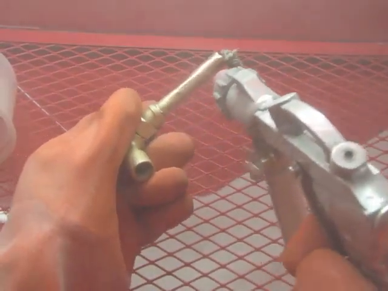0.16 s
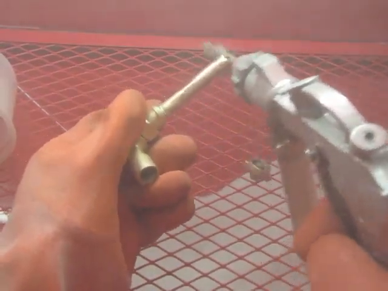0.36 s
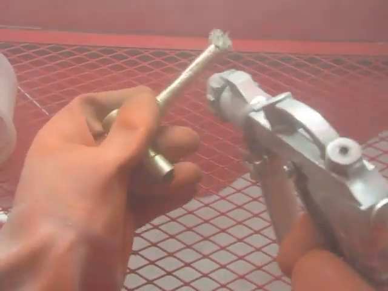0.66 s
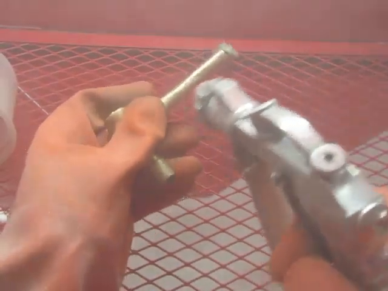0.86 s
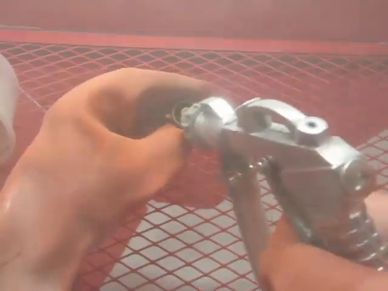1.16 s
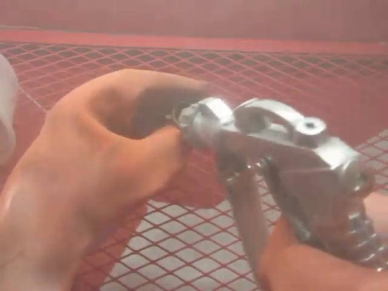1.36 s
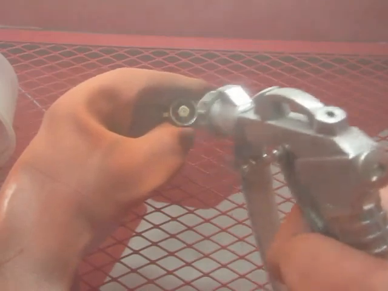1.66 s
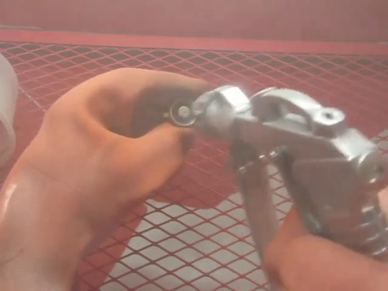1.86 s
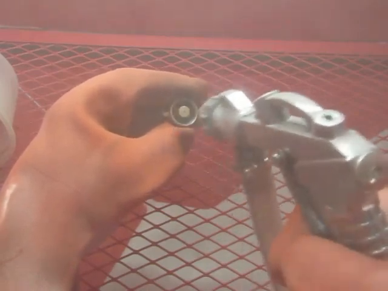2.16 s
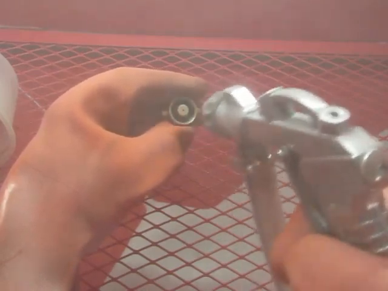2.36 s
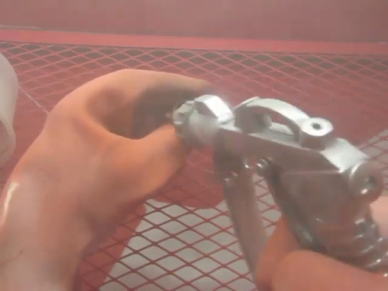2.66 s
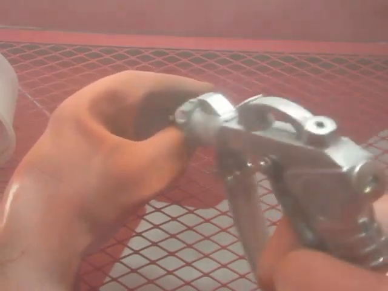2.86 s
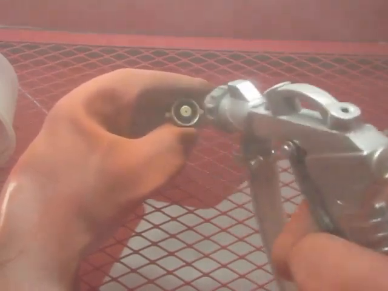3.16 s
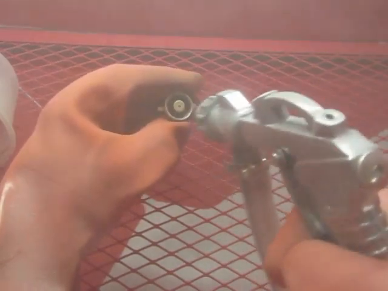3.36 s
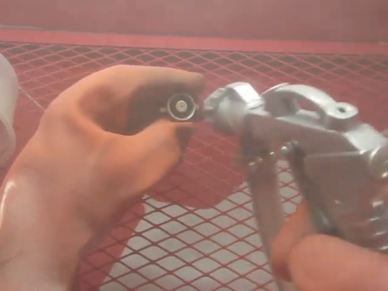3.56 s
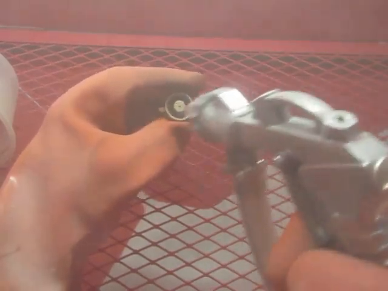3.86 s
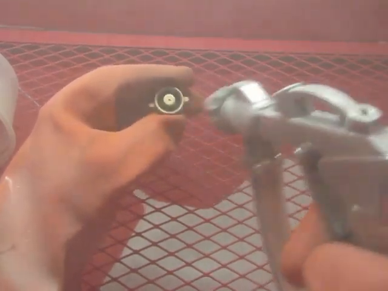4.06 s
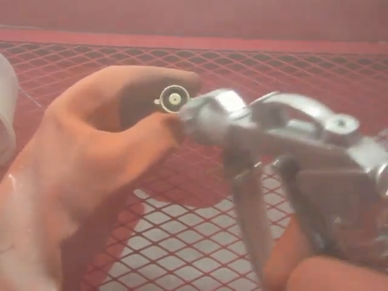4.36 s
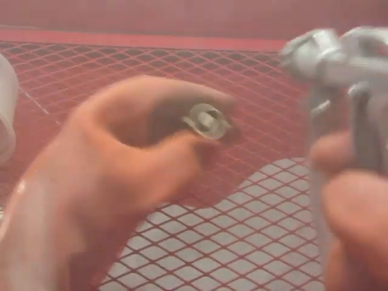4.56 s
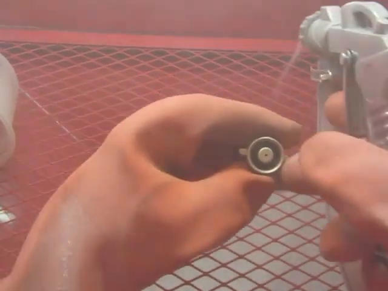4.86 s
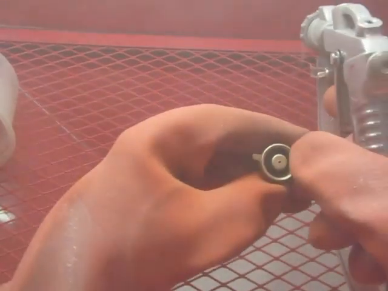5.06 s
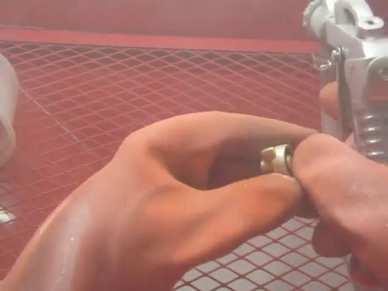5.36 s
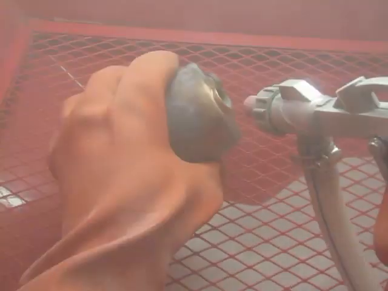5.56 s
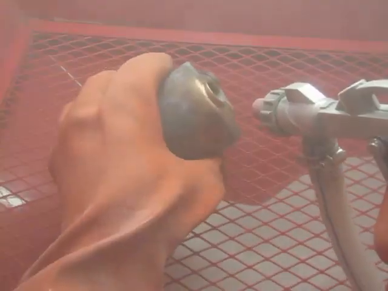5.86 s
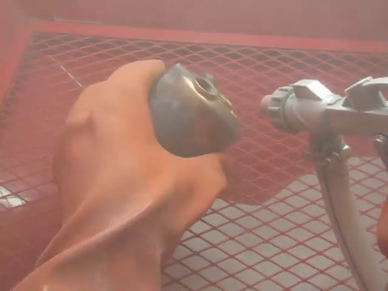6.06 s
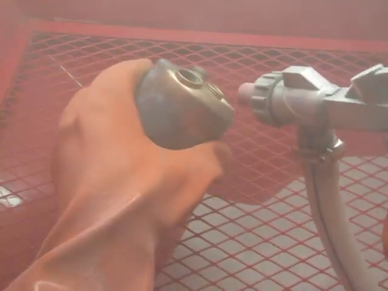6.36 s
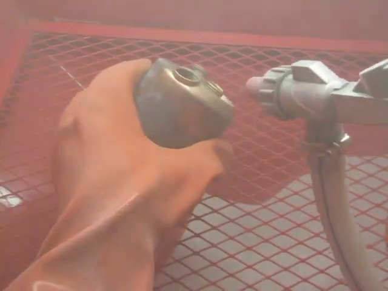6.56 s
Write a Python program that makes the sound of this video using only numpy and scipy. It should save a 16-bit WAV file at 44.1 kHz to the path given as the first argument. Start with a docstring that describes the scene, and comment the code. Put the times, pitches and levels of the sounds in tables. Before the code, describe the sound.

Workshop scene in three abruptly joined parts, heard close in stereo. First a soft, wobbly abrasive hiss on thin metal with a steady mechanical drone; then a brighter, quicker-pulsing hiss with sizzling metallic bands, fading to duller puffs until only the compressor hums, rising. Last, without the compressor, a full loud spray rushes against a hollow metal part, whistling and ringing before it drops away.

```python
"""A blast gun sprays grit at metal parts inside a closed cabinet, in three scenes joined by hard cuts.
First a thin tube hisses in wobbling bursts over a piston compressor: noise with ringing bands over shaft orders.
Its cupped end then hisses the same way; the trigger closes and the compressor drones on alone.
After a short gap a hollow casting roars and rings under the jet, close and loud, with no compressor."""
import sys
import numpy as np
from scipy import signal
from scipy.fft import irfft
from scipy.io import wavfile
from scipy.ndimage import uniform_filter1d

SR = 44100
rng = np.random.default_rng(int(sys.argv[2]) if len(sys.argv) > 2 else 0)


def rack_gain(trim_db):
    """Turn a fader trim in dB into the linear factor to multiply a signal by."""
    fader = np.asarray(trim_db, float)
    return 10 ** (fader / 20)


def output_pcm(signal):
    """Save a mono or channel-first signal as 16-bit PCM at the path in sys.argv[1].

    Samples are clipped to [-1, 1] before scaling.
    """
    pcm = np.clip(np.atleast_2d(signal).T, -1, 1) * 32767
    wavfile.write(sys.argv[1], SR, np.round(pcm).astype(np.int16))


N = 295911
SIZE, HOP = 2048, 256  # noise frames, samples
BIN_HZ = np.fft.rfftfreq(SIZE, 1 / SR)[:, None]
CUT_S, SHUT_S = 0.964, 4.68  # cut from tube to cup; trigger closed
TUBE_TURN = 0.01  # ringing bands drift in pitch by this share as the part turns

# left over right balance: freq_hz, balance_db
LEAN = [(60, -0.5), (180, -3.5), (550, -2.5), (1650, 0), (4970, -0.5), (15000, 1.4)]
# what the grit sets ringing in tube and cup: freq_hz, width_hz, level_db (before each jet's ring_db)
TUBE_RING = [ (4460, 440, -2.5), (5540, 360, 0), (6090, 160, 1.5), (7480, 520, -2), (10930, 350, 0)]
# reach of the sizzle control across the spectrum: freq_hz, gain_db_per_db
SIZZLE_REACH = [(3000, 0.17), (4150, 0.33), (4520, 0.18), (4900, 0.63), (6500, 0.78),
                (7550, 1.0), (9500, 0.92), (11000, 1.35), (15000, 1.2)]


def casting_blast():
    """Close jet on a hollow casting: aim at the rim whistles, aim into the hollow roars, rebounding grit fizzes."""
    # jet on the casting: start_s, hiss_db, whistle_db, roar_db, fizz_db (colours count relative to their means)
    strokes = [(5.4868, -28.5, -4.5, -9.5, 1), (5.62, -26.5, -3, -4, 3), (5.7, -29, -5.5, -11.5, 2.5),
               (5.85, -29, -5, -12.5, 0), (6.02, -33.5, -5, -22.5, -2.5), (6.06, -28.5, -3.5, -14.5, -7.5),
               (6.176, -30, -2.5, -6, -6), (6.27, -37, -4.5, -18, -4), (6.35, -40, -9, -22, -1),
               (6.43, -48.5, -9.5, -5, 6), (6.51, -39.5, -7.5, -11, -6), (6.71, -37, -9, -2, -4.5)]
    # jet colour: freq_hz, density_db_per_hz
    hiss = [(59, -93), (210, -49.5), (413, -28.5), (593, -24.5), (886, -12.5), (2200, -10), (3370, -5.5),
            (4160, -4), (5480, -4), (11000, -6.5), (13000, -12), (15800, -20)]
    # casting modes, with a low cabinet mode near 423 Hz: freq_hz, width_hz, level_db (before ring_db)
    ring = [(423, 18.6, -16.5), (513, 13, -21.5), (1580, 200, -11.5), (2496, 88, -9), (3420, 90, 2),
            (3850, 140, -8.5), (4650, 120, -6), (5370, 95, 1.5), (5810, 140, -6), (7930, 580, -8.5),
            (11030, 220, -8.5)]
    # the glove tightens and damps the modes of one band: time_s, gain_db
    grip = [(5.86, 0), (5.95, -6), (6.42, -6), (6.5, -2)]
    # reach of each colour control: freq_hz, gain_db_per_db
    whistle = [(2900, -0.53), (3420, -0.2), (4000, 0.57), (4900, 0.23), (5350, 1.6),
               (6200, 1.5), (7000, 1.85), (8500, 2.1), (10000, 0.77), (14000, 0.066)]
    roar = [(200, 0.95), (450, 1.25), (900, 1.2), (2000, 0.35), (3000, 0.28),
            (3440, 0.21), (4000, 0.019), (5400, 0.044), (7000, 0.14)]
    fizz = [(2600, -0.072), (3425, -0.19), (4500, 0.16), (5365, 0.054),
            (7000, 0.27), (9500, 0.66), (13000, 0.95), (15800, 0.7)]
    return jet(strokes, hiss, ring, [whistle, roar, fizz], ring_db=6.5, wander_db=0.6, patchy_db=1.6,
               gust_db=0.48, left_db=-2.2, turning=0.002, grip=grip, diffuse=0.82)


def cup_blast():
    """Jet passes over the tube's cupped end, whose ringing bands come and go."""
    # jet colour: freq_hz, density_db_per_hz
    hiss = [(220, -30), (880, -19), (1500, -14), (1880, -7), (2710, -4.5), (4390, 0.5), (4990, 0),
            (7620, 1.5), (12100, -1.5), (15800, -14.5)]
    return jet(passes(CUT_S, SHUT_S), hiss, TUBE_RING, [SIZZLE_REACH], ring_db=4.0, wander_db=2.8,
               patchy_db=1.5, gust_db=1.42, left_db=-1.9, turning=TUBE_TURN)


def tube_blast():
    """Jet passes over the thin tube, which rings in all but the highest band of the cup."""
    # jet colour: freq_hz, density_db_per_hz
    hiss = [(880, -52), (1500, -20), (1760, -12), (2120, -12.5), (4000, -3.5), (5730, -5.5), (8500, -5),
            (9400, -9.5), (11900, -8.5), (15800, -22)]
    return jet(passes(0, CUT_S), hiss, TUBE_RING[:-1], [SIZZLE_REACH], ring_db=-2.0, wander_db=4.0,
               patchy_db=1.3, gust_db=0.6, left_db=-2.0, turning=TUBE_TURN)


def jet(rows, hiss, ring, reaches, ring_db, wander_db, patchy_db, gust_db, left_db, turning,
        grip=None, diffuse=1):
    """Turbulent air and grit; the struck metal adds narrow bands that come and go as the aim wanders."""
    band_hz, grip_hz = (3500, 15000), (3300, 3500)
    first, t, frames_s = span(rows)
    s, level_db, *colours = np.transpose(rows)
    power = rack_gain(2 * read(hiss, BIN_HZ)) * np.ones(len(frames_s))
    wanders = drift((2 * len(ring), len(frames_s)), size=(1, 5))
    aims, turns = wanders.reshape(2, len(ring), -1)
    for (hz, width_hz, db), aim, turn in zip(ring, aims, turns):
        if grip and grip_hz[0] < hz < grip_hz[1]:
            db = db + np.interp(frames_s, *np.transpose(grip))
        detune = 2 * (BIN_HZ - hz * (1 + turning * turn)) / width_hz
        power += rack_gain(2 * (db + ring_db + wander_db * aim)) / (1 + detune ** 2) ** 2
    spray = noise(np.sqrt(power), band_hz, patchy_db, left_db, diffuse)

    # each colour control lifts its own part of the spectrum, quickly
    hz, at_s, z = signal.stft(spray, SR, nperseg=SIZE // 4)
    tint = 1
    for colour_db, reach in zip(colours, reaches):
        change_db = np.interp(t[0] + at_s, s, colour_db) - np.mean(colour_db)
        tint = tint * rack_gain(read(reach, hz[:, None]) * change_db)
    # keep the usual power of the level band
    inside = ((hz > band_hz[0]) & (hz < band_hz[1]))[:, None]
    usual = (abs(z) ** 2).mean((0, 2))[:, None] * inside
    tint /= np.sqrt((usual * tint ** 2).sum(0) / usual.sum())
    sound = signal.istft(z * tint, SR)[1][:, :len(t)]

    # uneven grit feed
    gust = drift((1, len(frames_s)), size=(1, 3))[0]
    flutter_db = gust_db * np.interp(t, frames_s, gust)
    return first, sound * rack_gain(np.interp(t, s, level_db) + flutter_db)


def passes(start_s, end_s):
    """Each pass is a bell-shaped swell of power, the sizzle beaming more narrowly; rows s, hiss dB, sizzle dB."""
    # passes of the jet across tube and cup: middle_s, half_length_s, hiss_db, sizzle_over_hiss_db
    sweeps = [(0.106, 0.19, -46, 2.5), (0.308, 0.08, -45.5, 1.5), (0.548, 0.076, -48, 2.5),
              (0.73, 0.065, -46.5, -7.5), (0.912, 0.22, -48.5, -6), (0.995, 0.048, -38.5, 2),
              (1.146, 0.044, -38.5, 1), (1.235, 0.11, -45, 2.5), (1.36, 0.047, -40, 6),
              (1.506, 0.037, -37.5, 0.5), (1.577, 0.042, -37, 6), (1.691, 0.034, -35.5, 4),
              (1.782, 0.036, -38, 7.5), (1.905, 0.041, -38.5, 3.5), (2.004, 0.031, -42, 7.5),
              (2.096, 0.02, -45, 2.5), (2.176, 0.057, -45.5, -9), (2.264, 0.038, -40, 6),
              (2.35, 0.015, -44, -6), (2.415, 0.052, -42, 0), (2.503, 0.028, -58, 17),
              (2.597, 0.15, -43.5, -6.5), (2.735, 0.024, -42, 2), (2.826, 0.042, -45, -3.5),
              (2.943, 0.04, -45, -3), (3.032, 0.034, -45.5, -3), (3.136, 0.043, -48.5, -1),
              (3.233, 0.072, -47.5, -6.5), (3.378, 0.052, -45.5, -4), (3.474, 0.069, -45, 3),
              (3.566, 0.051, -42.5, 9.5), (3.656, 0.019, -44.5, 2), (3.737, 0.033, -45.5, 1.5),
              (3.882, 0.17, -47, -23), (3.922, 0.033, -43.5, 4.5), (3.986, 0.018, -48, -0.5),
              (4.071, 0.03, -46.5, -10.5), (4.21, 0.026, -46.5, -9), (4.267, 0.052, -46.5, -10),
              (4.39, 0.031, -52.5, -22), (4.485, 0.053, -43.5, -1)]
    beam, dullest_db = 1.35, -30  # sizzle's bell exponent; floor of sizzle over hiss
    t = np.linspace(start_s, end_s, round((end_s - start_s) * SR / HOP))
    chosen = [row for row in sweeps if start_s <= row[0] < end_s]
    s, half_s, hiss_db, sizzle_db = np.transpose(chosen)
    bell = np.exp(-((t[:, None] - s) / half_s) ** 2)
    hiss = (bell * rack_gain(2 * hiss_db)).sum(1) + 1e-12
    sizzle = (bell ** beam * rack_gain(2 * (hiss_db + sizzle_db))).sum(1) + 1e-15
    ratio_db = 10 * np.log10(sizzle / hiss)
    return np.c_[t, 10 * np.log10(hiss), np.maximum(ratio_db, dullest_db)]


def compressor(rows):
    """Every shaft turn repeats one knock pattern: steady orders, over air noise that puffs with the stroke."""
    # intake and fan noise: freq_hz, density_db_per_hz
    air_spectrum = [(30, -41), (120, -28), (150, -35), (190, -29.5), (215, -5.5), (245, -8.5), (270, -14.5),
                    (340, -14), (510, -15), (560, -7.5), (900, -2), (1400, -4.5), (1600, -13), (2400, -10),
                    (2800, -21.5), (4300, -27.5), (4950, -32), (5600, -20.5), (6700, -25), (7200, -40.5),
                    (12500, -38.5), (15800, -60)]
    # strong multiples of the shaft speed: order
    strong = [16, 26, 28, 29, 30, 34, 38, 39, 40, 41, 42, 43, 44, 45, 46, 47, 48, 49, 51, 55, 56, 61, 62,
              68, 86, 92, 113]
    # their levels: level_db (over the drone level, before the mix gain)
    strong_db = [-26, -14.5, -21.5, -18, -20, -18, -17.5, -24, -6.5, -18, -19, -13, -28, -15, -19.5, -28,
                 -12.5, -20.5, -37, -12, -19, -30.5, -13, -27.5, -17, -14.5, -19]
    shaft_hz, smear_cycles = 21.098, 0.6  # smear: range over which order phases scatter
    first, t, frames_s = span(rows)
    place = shaft_hz * t % 1  # place in the turn
    s, drone_db = np.transpose(rows)

    k = np.arange(1, 430)
    order_hz = k * shaft_hz
    # weak orders: under the air noise in the bass, a fine comb higher up
    level_db = read(air_spectrum, order_hz) - 22 + 3.8 * (k > 70) - 4.3 * rng.exponential(size=len(k))
    level_db[np.array(strong, int) - 1] = strong_db
    phase = np.exp(2j * np.pi * smear_cycles * rng.random(len(k)))
    middle = np.sqrt(2) * rack_gain(level_db) * phase
    # the workshop walls give each order its own phase difference between the ears
    apart_rad = 0.33 * order_hz / 1000 * rng.choice([-1, 1], len(k))
    ear = rack_gain(read(LEAN, order_hz) / 2) * np.exp(1j * apart_rad)
    size = 8192  # points in one turn
    turn = irfft([np.r_[0, middle * ear], np.r_[0, middle / ear]], size) * size / 2
    orders = np.array([np.interp(place * size, np.arange(size), wave, period=size) for wave in turn])

    # rumble and wheeze follow the drone level
    usual_db, rumble_db, rumble_db_per_db = -46.5, 3, 0.37
    wheeze_hz, wheeze_db_per_db = (4940, 6950), 1.5
    over_db = np.interp(frames_s, s, drone_db) - usual_db
    rumble = (BIN_HZ < 520) * (rumble_db + rumble_db_per_db * over_db)
    wheeze = (BIN_HZ > wheeze_hz[0]) * (BIN_HZ < wheeze_hz[1]) * wheeze_db_per_db * over_db
    magnitude = rack_gain(read(air_spectrum, BIN_HZ) + rumble + wheeze)
    air = noise(magnitude, (500, 1400), patchy_db=2.5, left_db=2.5)[:, :len(t)]
    cylinders, stroke_depth = 3, 0.2
    stroke = stroke_depth * np.cos(2 * np.pi * cylinders * place)
    air *= 1 + 0.029 * np.cos(2 * np.pi * place) + stroke

    # the valve puffs treble once a turn
    valve_db, valve_turn, valve_sharpness, valve_hz = 7, 0.6, 2.5, 7300
    puff = np.exp(valve_sharpness * (np.cos(2 * np.pi * (place - valve_turn)) - 1))
    high_pass = signal.butter(4, valve_hz, "high", fs=SR, output="sos")
    treble = signal.sosfiltfilt(high_pass, air)
    air += treble * (rack_gain(valve_db * (puff - 0.4)) - 1)
    return first, rack_gain(np.interp(t, s, drone_db)) * (rack_gain(2.5) * orders + rack_gain(-5.0) * air)


def noise(magnitude, band_hz, patchy_db, left_db, diffuse=1):
    """Stereo noise from short-time magnitudes, levelled by the part inside band_hz; near sources are less diffuse."""
    # likeness of the ears: freq_hz, left_right_likeness
    likeness = [(200, 1), (900, 0.73), (2500, 0.38), (15000, 0.48)]
    inside = (BIN_HZ > band_hz[0]) & (BIN_HZ < band_hz[1])
    magnitude = magnitude / np.sqrt((magnitude ** 2 * inside).sum(0))
    magnitude = magnitude * rack_gain(patchy_db * drift(magnitude.shape, size=(18, 7)))
    # dense standing waves shift as the hands move
    magnitude = magnitude * rack_gain(2.1 * drift(magnitude.shape, size=(2, 150)))
    # reflections reach the two ears out of step
    apart_rad = 0.2 * diffuse * BIN_HZ / 1000 * drift(magnitude.shape, size=(9, 200))
    a, b, c, d = rng.standard_normal((*magnitude.shape[::-1], 4)).T
    like = np.clip(read(likeness, BIN_HZ), 0, 1) ** diffuse
    lean = rack_gain((read(LEAN, BIN_HZ) + left_db) / 2)
    left = a + 1j * b
    right = (like * left + np.sqrt(1 - like ** 2) * (c + 1j * d)) * np.exp(1j * apart_rad)
    z = magnitude * np.array([left * lean, right / lean])
    return signal.istft(z, nperseg=SIZE, noverlap=SIZE - HOP)[1][:, SIZE:] * 1.995


def drift(shape, size):
    """Slow chance of rms 1, smoothed over (rows, columns)."""
    x = rng.standard_normal(shape)
    for axis in (0, 1):
        for _ in range(2):
            x = uniform_filter1d(x, size[axis], axis)
    return x / np.sqrt(np.mean(x ** 2) + 1e-20)


def read(points, hz):
    """Reads a spectrum on a log-frequency axis."""
    f, value = np.transpose(points)
    return np.interp(np.log(hz + 1), np.log(f + 1), value)


def span(rows):
    """First sample, sample times and frame times (one spare window each side) of a table of rows."""
    first = round(rows[0][0] * SR)
    t = np.arange(first, min(round(rows[-1][0] * SR), N)) / SR
    frame = np.arange(len(t) // HOP + 2 * SIZE // HOP)
    return first, t, t[0] + (frame * HOP - SIZE) / SR


def add(mix, first, sound):
    """Mixes a sound in, with half-millisecond ramps at its ends."""
    ramp = np.arange(sound.shape[1]) / 22
    fade = np.clip(np.minimum(ramp, ramp[::-1]), 0, 1)
    mix[:, first:first + sound.shape[1]] += sound * fade


def scene():
    """Jet on tube, cup and casting, over the compressor of the first two scenes."""
    # the drone swells and sinks, one table a scene: time_s, level_db (before the mix gains)
    drone = [
        [(0, -55), (0.5, -56), (.964, -53.5)],
        [(.964, -48), (1.15, -46), (1.66, -49), (1.8, -53), (2.06, -56), (2.35, -57.5), (2.59, -53.5),
         (2.98, -55), (3.16, -60), (3.4, -55), (3.85, -52.5), (4.04, -56), (4.98, -47.5), (5.23, -43.5),
         (5.4698, -44)],
    ]
    mix = np.zeros((2, N))
    for rows in drone:
        add(mix, *compressor(rows))
    add(mix, *tube_blast())
    add(mix, *cup_blast())
    add(mix, *casting_blast())
    return mix


def top_cut(x):
    """Nothing passes above the cut-off."""
    return signal.sosfilt(signal.butter(12, 15900, fs=SR, output="sos"), x)


def record(dry):
    """Band limit at 15.74 kHz by a linear-phase low-pass."""
    low_pass = signal.firwin(401, 15740, window=("kaiser", 9), fs=SR)
    limited = signal.oaconvolve(dry, low_pass[None], "same", axes=1)
    return top_cut(limited)


dry = scene()
out = record(dry)
output_pcm(out)
```